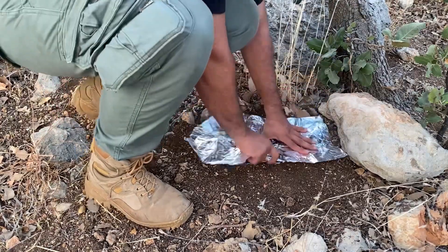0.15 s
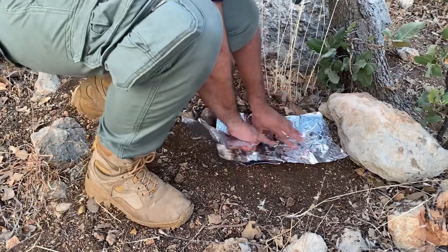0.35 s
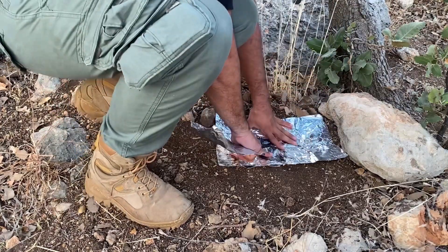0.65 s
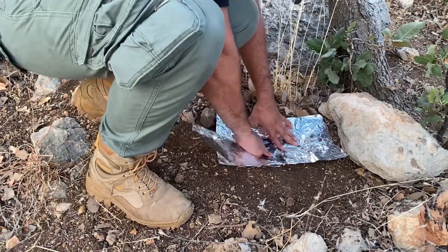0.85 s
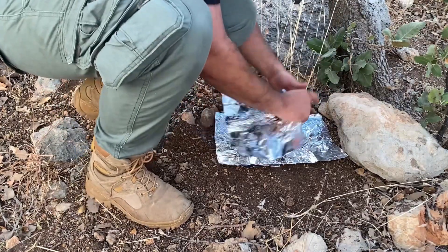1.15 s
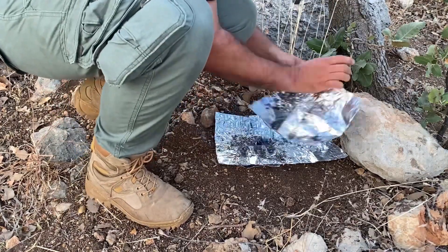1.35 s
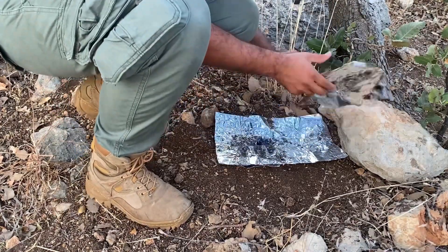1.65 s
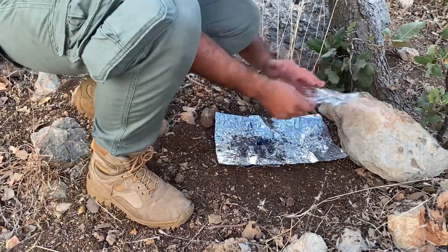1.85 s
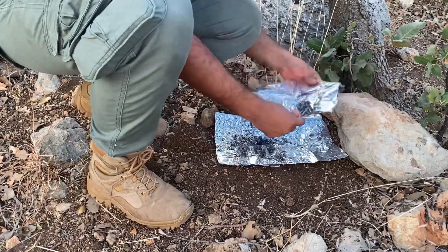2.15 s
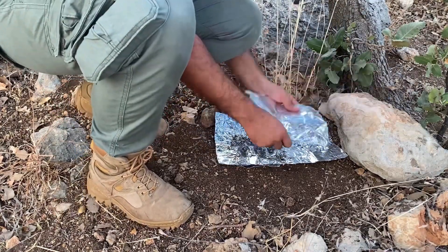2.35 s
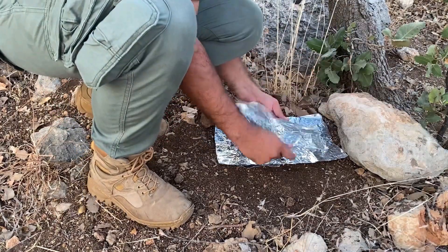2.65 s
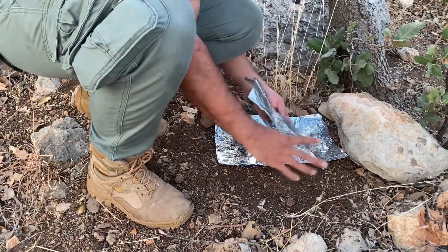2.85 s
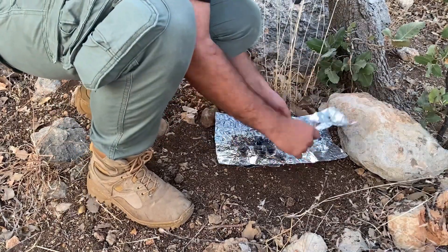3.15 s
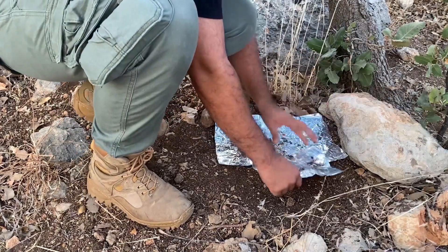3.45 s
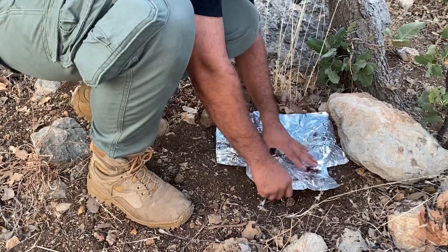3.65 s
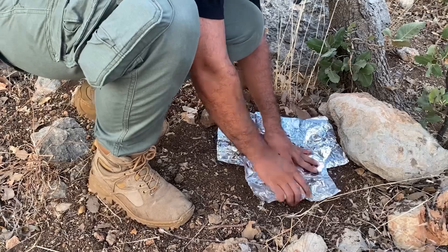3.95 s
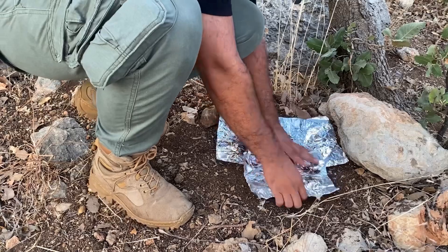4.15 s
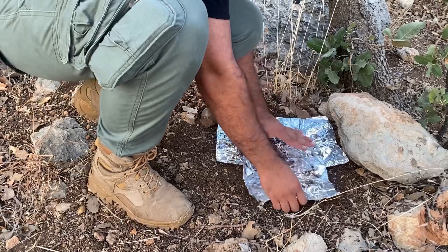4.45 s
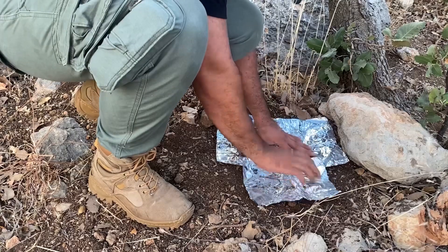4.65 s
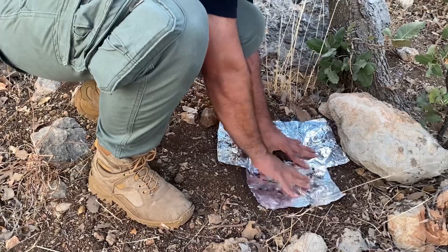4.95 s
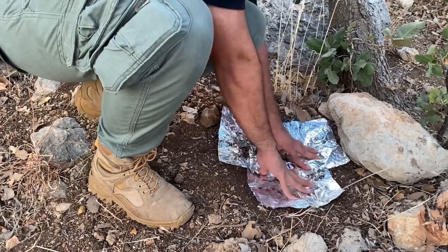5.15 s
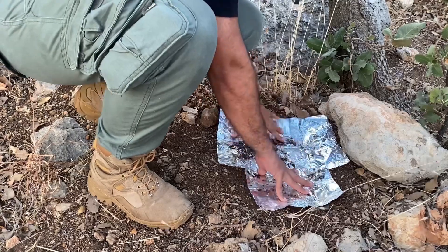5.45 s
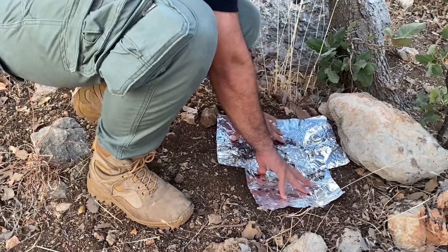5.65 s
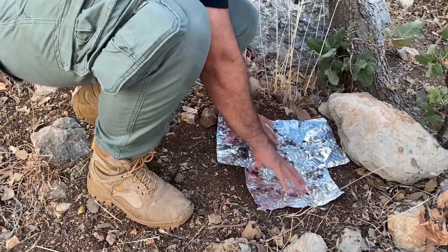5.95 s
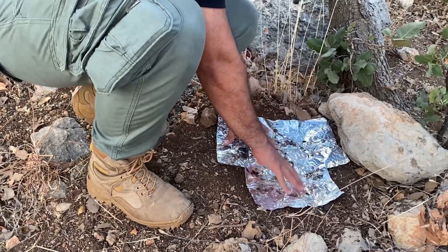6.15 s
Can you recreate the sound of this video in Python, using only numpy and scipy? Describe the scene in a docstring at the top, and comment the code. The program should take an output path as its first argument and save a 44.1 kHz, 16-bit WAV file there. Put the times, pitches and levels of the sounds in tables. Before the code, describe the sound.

Close outdoor stereo phone pickup of hands working a foil sheet on the ground. Bright, dry crinkling comes in quick strokes with sharp snaps, nearly stopping between early strokes. Fuller smoothing follows, with one tiny high squeak near 4.4 seconds. Wind rumble on the microphone is slight at first, then swells strongly from about 3.5 seconds and eases late. Air and far leaves are barely audible.

```python
"""Foil rustles and snaps close to a phone: hands unfold a sheet and smooth it over stony forest ground.
Rustle is shaped noise with tiny buckles and ringing facets; snaps are filtered bursts around a pitch.
A palm squeals once (three wavering harmonics) and patches of the sheet sing as short single modes.
A rising breeze buffets the microphone as lumpy low noise with separate eddy bursts.
Faint noise stands for far leaves and air."""
import sys
import numpy as np
from scipy import signal
from scipy.fft import rfft, irfft, next_fast_len
from scipy.io import wavfile
from scipy.ndimage import uniform_filter1d, map_coordinates

SR = 44100
rng = np.random.default_rng(int(sys.argv[2]) if len(sys.argv) > 2 else 0)


def invert_db(x):
    """Field ratio 10**(x/20) for x, a level in decibels (scalar or array-like)."""
    u = np.asarray(x, float) / 20
    return 10 ** u


def pcm_store(signal):
    """Save signal as 16-bit PCM."""
    levels = np.round(np.clip(np.atleast_2d(signal), -1, 1) * 32767)
    wavfile.write(sys.argv[1], SR, levels.astype(np.int16).T)


N = 277830

# sheet stirring in the hands between strokes: t/s, relative rustle level/dB, tilt/(dB per octave)
STIRRING = [(0, -44.5, -2), (.6, -74, 8), (.75, -54.5, -2.5), (1.2, -53.5, -1), (1.42, -66, -4.5),
            (1.7, -63, 1), (1.9, -58.5, -2.5), (2.1, -59.5, 3), (2.6, -59, -1.5), (2.82, -75, 2),
            (3.0, -66, 8), (3.16, -79, 3), (3.36, -78, 8), (3.42, -57, -11), (3.62, -55, -1),
            (4.15, -50, -3), (4.56, -58, -4.5), (5.1, -50, -3), (5.35, -58, -1), (5.8, -60.5, -1.5),
            (6.3, -65, -2.5)]
# hand strokes over the sheet: start/s, hold/s, relative rustle level/dB, tilt/(dB per octave)
HAND_STROKES = [(0, 0.02, -39.5, -1), (0.12, 0.017, -47.5, -1.2), (0.155, .11, -35.5, -0.7),
                (.39, 0.094, -41, -0.9), (0.557, 0.074, -41, -2), (0.673, 0.014, -54, 3.5),
                (1.256, 0.02, -42.5, -3), (1.317, 0.0059, -44, -0.5), (1.759, 0.0088, -53.5, -1.5),
                (1.853, 0.0094, -49.5, 2.2), (1.963, 0.049, -43, 0), (2.144, 0.0071, -47.5, -1.5),
                (2.261, 0.021, -51, 0), (2.314, 0.0099, -51.5, -4.5), (2.431, 0.097, -55.5, -1.7),
                (2.666, 0.058, -41.5, -2.5), (2.998, 0.0068, -43, 4), (3.054, 0.037, -48, 0),
                (3.387, 0.007, -47.5, 2), (3.477, .06, -45.5, -1), (3.697, .04, -43, -1),
                (3.812, 0.02, -43, -1.5), (4.093, 0.012, -35.5, 2.5), (4.208, 0.059, -43, 4),
                (4.409, 0.062, -33.5, 5.5), (4.673, 0.04, -49, 0), (4.915, 0.063, -46, -0.5),
                (5.02, 0.036, -42, -3), (5.126, 0.01, -50.5, 11), (5.185, 0.081, -55, 3.5),
                (5.477, 0.037, -40, -2.5), (5.722, 0.018, -60, -5), (5.8, 0.041, -57, 4.5)]
# snapping creases: t/s, relative level/dB, centre f/Hz, t60/s
CREASE_SNAPS = [(0.0304, -21.5, 10500, 0.02), (0.0375, -21.5, 1070, 0.019), (0.094, -30, 2730, 0.027),
                (0.1006, -28, 1330, 0.045), (0.1342, -57, 2600, 0.028), (0.3935, -46, 1340, 0.021),
                (0.408, -25.5, 3730, 0.041), (0.418, -28, 1480, 0.044), (0.4507, -24.5, 1120, 0.043),
                (0.4774, -25.5, 2320, 0.035), (0.492, -35, 5700, 0.035), (0.5497, -26.5, 1170, 0.027),
                (0.5596, -29, 1600, 0.063), (0.5831, -27, 1100, 0.022), (0.62, -28.5, 4370, 0.033),
                (0.632, -31.5, 2720, 0.029), (0.6582, -25, 7600, 0.048), (0.896, -39, 1410, 0.034),
                (0.9883, -30, 1300, 0.047), (1.2055, -40, 1270, 0.047), (1.2469, -34, 2360, 0.029),
                (1.2602, -27.5, 5200, 0.056), (1.3225, -33.5, 1690, 0.13), (1.7507, -35, 1850, 0.057),
                (1.8948, -37, 2360, 0.033), (1.909, -37, 1700, 0.037), (1.936, -23, 2880, 0.036),
                (1.942, -25, 3200, 0.11), (2.0053, -28, 2800, 0.026), (2.147, -39.5, 2710, 0.042),
                (2.2616, -24, 1060, 0.021), (2.2738, -21.5, 2040, 0.031), (2.316, -19.5, 2110, 0.025),
                (2.555, -38, 1100, 0.046), (2.8957, -47.5, 2540, 0.2), (2.9484, -40, 2780, 0.052),
                (3.003, -32, 2070, 0.06), (3.3808, -33, 2330, 0.077), (3.455, -36, 2960, 0.042),
                (3.8017, -21.5, 2130, 0.04), (3.8844, -34, 1980, 0.033), (3.9237, -32.5, 1490, 0.034),
                (3.9953, -36, 1820, 0.026), (4.0979, -26.5, 1260, 0.048), (4.2045, -35, 3560, 0.076),
                (4.6752, -35, 1160, 0.03), (4.711, -30.5, 1170, 0.03), (4.8816, -28, 1600, 0.031),
                (4.939, -33.5, 2830, 0.037), (4.9668, -37, 1130, 0.077), (5.0365, -22.5, 2300, 0.062),
                (5.0604, -28, 1600, 0.03), (5.0918, -25, 4450, 0.023), (5.1279, -15, 2450, 0.016),
                (5.163, -30, 2170, 0.027), (5.1892, -32, 1510, 0.024), (5.2215, -34.5, 1220, 0.047),
                (5.268, -31, 2060, 0.03), (5.427, -27, 2710, 0.027), (5.4806, -29.5, 1760, 0.089),
                (5.7126, -36.5, 1170, 0.043), (5.7996, -46.5, 3080, 0.089)]
# palm sticking and slipping fast: t/s, pitch f/Hz, level/dB, 2nd harmonic level/dB, 3rd harmonic level/dB
PALM_SQUEAL = [(4.369, 4230, -44, -49, -75), (4.38, 4190, -36.5, -37, -60), (4.402, 4220, -26, -29, -66),
               (4.413, 4100, -37, -38, -66), (4.425, 4100, -33, -37, -65), (4.438, 4040, -34, -42, -64)]
# patches that sing for a moment: start/s, length/s, f/Hz, relative level/dB
SINGING_PATCHES = [(.13, .077, 2540, -48), (1.753, .037, 3500, -56), (1.991, .04, 2800, -48),
                   (1.995, .018, 4800, -50), (2.72, .11, 845, -59), (3.0, .017, 1000, -47.5),
                   (3.002, .11, 2030, -57), (3.005, .095, 1280, -59.5), (4.096, .022, 1220, -43),
                   (4.39, .03, 10100, -33), (4.398, .04, 10750, -37), (4.402, .017, 9400, -33),
                   (4.42, .04, 6840, -29), (4.436, .032, 3200, -38), (4.438, .025, 11000, -34),
                   (4.44, .03, 4640, -37), (4.442, .045, 7700, -35), (4.445, .018, 12270, -38),
                   (4.46, .045, 2360, -38.5), (4.465, .04, 1880, -45), (5.709, .03, 2440, -55),
                   (5.712, .025, 1220, -49)]
# foil spectrum: f/Hz, relative density/dB
FOIL_SPECTRUM = [(150, -69), (400, -8), (900, -8), (2500, -6), (5000, -10), (7500, -8), (9000, -7),
                 (12000, -14.5), (13000, -18.5), (14500, -15.5), (16000, -26)]
# breeze between gusts: t/s, relative buffet level/dB, relative brightness of the upper part/dB
BREEZE = [(0, -52, -8), (.4, -63, 3.5), (.8, -55.5, -12.5), (1.05, -59.5, -6), (1.5, -67.5, -1),
          (1.85, -67, -1), (2.1, -51.5, -21), (2.45, -45.5, -23), (2.7, -52, -26), (2.95, -58, -4.5),
          (3.25, -62, -8.5), (3.35, -47, -23), (3.95, -43.5, -8.5), (4.5, -42.5, -6), (5.3, -38, -12),
          (6.0, -43, -15.5), (6.3, -48, -21)]
# gusts: start/s, hold/s, relative buffet level/dB, relative brightness/dB
WIND_GUSTS = [(0.13, .02, -43.5, -29), (0.207, 0.047, -54, 9), (0.433, 0.046, -55, -6),
              (0.819, 0.04, -51.5, -2.5), (0.894, 0.037, -40.5, -40), (1.292, 0.11, -57, -5),
              (1.92, 0.098, -52, 3), (2.434, 0.074, -43.5, -16), (2.517, 0.068, -41, -6.5),
              (2.61, 0.053, -45, -12), (2.818, 0.055, -48, -33), (3.352, 0.17, -40, -24.5),
              (3.573, 0.012, -35, -31), (3.71, 0.021, -33.5, -24), (3.78, 0.11, -35, -7.5),
              (4.074, .08, -29.5, -5), (4.206, 0.068, -27.5, -6.5), (4.357, 0.027, -25.5, -15.5),
              (4.414, 0.048, -26, -0.5), (4.503, 0.041, -30, -2), (4.599, 0.072, -29.5, -3),
              (4.698, 0.058, -31.5, 2), (4.795, 0.041, -30, -7.5), (4.863, 0.026, -33, 3.5),
              (4.925, 0.055, -31, -2.5), (5.088, 0.069, -32, 0.5), (5.197, 0.045, -28.5, 3.5),
              (5.272, 0.04, -36.5, 4.5), (5.377, 0.023, -31, -8.5), (5.433, 0.059, -31.5, -1.5),
              (5.598, 0.047, -35, -3.5), (5.82, 0.067, -38.5, 2), (5.923, 0.023, -38.5, -7),
              (6.035, 0.012, -40.5, 10.5), (6.2, 0.1, -41.5, -17)]
# single eddies bursting on the port: t/s, relative level/dB, starting f/Hz
EDDY_PUFFS = [(3.807, -21.5, 317), (3.849, -27, 250), (4.062, -20.5, 257), (4.117, -25, 337),
              (4.412, -21.5, 390), (4.434, -19, 252), (4.455, -27, 355), (4.501, -24, 352),
              (4.546, -22, 382), (4.578, -28.5, 320), (4.617, -24.5, 450), (4.643, -27.5, 370),
              (4.693, -26, 538), (4.715, -23, 355), (4.809, -26, 250), (5.07, -27, 250), (5.119, -21, 250),
              (5.198, -24, 252), (5.224, -19, 268), (5.44, -21.5, 377), (5.595, -33.5, 260)]
# buffet spectrum: f/Hz, relative density/dB
BUFFET_SPECTRUM = [(15, -74), (28, -12), (40, -7.5), (62, 4), (85, 1), (130, -2.5), (250, -8.5),
                   (450, -17.5), (700, -30), (1000, -47.5), (1500, -70.5)]
# reach of brightness into the buffet: f/Hz, share/1
BRIGHTNESS_REACH = [(120, 0), (350, 0.7), (700, 1.3)]
# forest spectrum: f/Hz, relative density/dB
FOREST_SPECTRUM = [(20, 2.5), (60, 19.5), (200, -22.5), (600, -0.5), (2000, -13), (6000, -14.5),
                   (12000, -16.5), (16000, -39)]
# ports, airborne sound: f/Hz, left lead/rad
PORT_LEAD = [(0, 0), (1800, 0), (3300, .6), (5400, .2), (6000, -.8), (7000, -.3), (8300, -3.1),
             (10400, -6.1), (11600, -6.5), (12700, -9.4), (14400, -9.45), (15200, -12.6), (16600, -12.6)]
# ports, airborne sound: f/Hz, left-right likeness/1
PORT_LIKENESS = [(100, .87), (700, .72), (1600, .84), (4000, .83), (6500, .6), (8500, .93), (11000, .97),
                 (12700, .995)]
# ports, airborne sound: f/Hz, left minus right/dB
PORT_LEAN = [(200, -.8), (700, -3), (1100, 0), (4000, -.6), (12000, -.2)]
# ports, wind: f/Hz, left lead/rad
WIND_PORT_LEAD = [(40, .2), (250, .35), (800, 1.05)]
# ports, wind: f/Hz, left minus right/dB
WIND_PORT_LEAN = [(250, 0), (450, 2), (800, 10.5)]

STROKE_BASE_RISE_DB_PER_S, STROKE_FALL_DB_PER_S = 330, 404
FLICK_S = 0.023  # a shorter stroke rises at more than twice the base rate
GUST_RISE_DB_PER_S, GUST_FALL_DB_PER_S = 502, 350
# chance pops of small creases: level over the stirring, scatter per e-fold, pitch range, decay
POP_OVER_DB, POP_SCATTER_DB, POP_LOW_HZ, POP_HIGH_HZ, POP_T60_S = 9.5, 1.5, 1100, 4000, 0.039
TOP_HZ = 15900
TIMES_S = np.arange(0, N / SR + .01, .002)


def rustle():
    """Dense tiny buckles and ringing facets over sliding noise, clumped in time and patchy in pitch."""
    hands = rubbing()
    level_db, _ = curves(hands, np.arange(N) / SR)
    chance, size = rng.random((2, N))
    buckles = (chance < 500 / SR) * invert_db(-4.5 * np.log(size + .02))  # about 500 a second
    t = np.arange(SR // 100) / SR
    ring = invert_db(-60 * t / .006) * rng.standard_normal(len(t))  # t60 6 ms
    crackle = unit(signal.fftconvolve(buckles, ring)[:N])
    sliding = rng.standard_normal(N)
    raw = 1.1 * crackle + .4 * facets(count=3500) + sliding
    raw = raw * invert_db(1.5 * wobble(40) + 1.5 * wobble(120))

    def colour_db(hz, t):
        octaves = np.log2((np.minimum(hz, 7000) + 200) / 3000)
        tilt_db = curves(hands, t)[1] * octaves
        patches = field((len(hz), len(t)), 2, 5)
        return along(FOIL_SPECTRUM, hz) + tilt_db + 2.67 * patches

    return invert_db(level_db - 4.0) * unit(painted(raw, colour_db, size=512))


def rubbing():
    """Rows (t/s, relative rustle level/dB, tilt/(dB per octave)): stirring plus strokes, flicks more abrupt."""
    hold_s = np.maximum(np.transpose(HAND_STROKES)[1, :, None], .005)
    rise_db_per_s = STROKE_BASE_RISE_DB_PER_S * (1 + FLICK_S / hold_s)
    return swells(STIRRING, HAND_STROKES, rise_db_per_s, STROKE_FALL_DB_PER_S)


def facets(count):
    """Small flat facets between creases, each ringing at its own pitch for a few dozen cycles."""
    start, pitch, life, size = rng.random((count, 4)).T[..., None]
    hz = 800 * 14 ** pitch
    t = np.arange(1200) / SR
    t60_s = np.minimum((25 + 60 * life) / hz, .035)
    decay = invert_db(-5 * np.log(size + 0.11) - 60 * t / t60_s)
    onset = 1 - np.exp(-t / 0.000068)
    rings = decay * onset * np.sin(2 * np.pi * hz * t)
    at = (start * N).astype(int) + np.arange(len(t))
    return unit(np.bincount(at.ravel(), rings.ravel())[:N])


def snaps():
    """Creases crack around a pitch and ring a few facets; slow folds crack less and shiver longer."""
    out, t = np.zeros(N + 4096), np.arange(4096) / SR
    hz = np.fft.rfftfreq(len(t), 1 / SR)

    def band(centre_hz, width_hz):
        damping = 1j * hz * width_hz
        return damping / (centre_hz ** 2 - hz ** 2 + damping)

    edge = invert_db(-7.0) * (1j * hz / (8000 + 1j * hz)) ** 2  # high-passed share of the burst
    foil = invert_db(.5 * along(FOIL_SPECTRUM, hz))
    for s, db, centre_hz, t60_s in CREASE_SNAPS + pops(count=130):
        noise = rng.standard_normal((2, len(t)))
        modes = np.append(0, rng.normal(0.32, 0.527, 4))  # log pitch ratios
        t60_s = max(t60_s, .005)
        sharp = np.clip(.03 / t60_s, 0, 1) ** 1.5
        shiver = (1 - np.exp(-t / 0.00096)) * invert_db(-60 * t / t60_s)
        burst = sharp * invert_db(-60 * t / .0045) * noise[0] + .3 * shiver * noise[1]
        rings = sum(band(centre_hz * np.exp(m), 230) for m in modes)
        response = band(centre_hz, 2.47 * centre_hz) + 2.75 * rings + edge
        crack = irfft(rfft(burst) * response * foil, len(t))
        out[round(s * SR):][:len(t)] += invert_db(db - 3.0) * crack / np.abs(crack).max()
    return out[:N]


def pops(count):
    """Rows like the crease snaps, at random moments, their level following the stirring."""
    when, size, pitch = rng.random((count, 3)).T
    s = when * N / SR
    db = curves(STIRRING, s)[0] + POP_OVER_DB - POP_SCATTER_DB * np.log(size + 0.028)
    centre_hz = POP_LOW_HZ * (POP_HIGH_HZ / POP_LOW_HZ) ** pitch
    return [(*row, POP_T60_S) for row in zip(s, db, centre_hz)]


def squeal():
    """Stick-slip gives a wavering pitch with two overtones."""
    t = np.arange(N) / SR
    hz, *levels_db = curves(PALM_SQUEAL, t)
    start_s, end_s = PALM_SQUEAL[0][0], PALM_SQUEAL[-1][0]
    on = np.clip(np.minimum(t - start_s, end_s - t) / 0.0025, 0, 1)
    phase = 2 * np.pi * np.cumsum(hz + 25 * wobble(220)) / SR
    harmonics = sum(invert_db(db) * np.sin(k * phase) for k, db in enumerate(levels_db, 1))
    return np.sqrt(2) * on * invert_db(2.4 * wobble(150)) * harmonics


def singing():
    """A rubbed patch holds one mode, swelling fast and fading, rough in level and phase."""
    out = np.zeros(N)
    for s, length_s, hz, db in SINGING_PATCHES:
        i = round(s * SR) + np.arange(round(length_s * SR))
        u = np.linspace(0, 1, len(i))
        knots = rng.standard_normal((2, 64))
        rough = [np.interp(u * length_s * 250, np.arange(64), r) for r in knots]  # 250 knots/s
        phase = 2 * np.pi * hz * u * length_s + hz / 4000 * rough[0]
        level = invert_db(db + np.sqrt(hz / 400) * rough[1])
        out[i] += level * np.sin(np.pi * u ** .5) * np.sin(phase)
    return out


def ground(x):
    """Stones, legs and the moving hands scatter the sound with phases that keep drifting."""
    z = signal.stft(x, nperseg=256)[2]
    drift_rad = 2.2 * field(z.shape, 4, 24)
    return signal.istft(z * np.exp(1j * drift_rad), nperseg=256)[1][:N]


def wind():
    """Eddies hit the ports in lumps; the brightness curve and a quick flutter move their upper part."""
    air, t_s = blowing(), np.arange(N) / SR
    level_db, _ = curves(air, t_s)
    lumps = invert_db(.8 * wobble(25) + 3.5 * np.tanh(wobble(70)))
    flutter_db = 5.1 * np.tanh(wobble(50)) + 5.9 * np.tanh(wobble(100))

    def bright_db(hz, t):
        return along(BRIGHTNESS_REACH, hz) * (curves(air, t)[1] + 8 + np.interp(t, t_s, flutter_db))

    eddies = filtered(lumps * rng.standard_normal((2, N)), lambda hz: invert_db(along(BUFFET_SPECTRUM, hz)))
    body_rms = filtered(eddies, lambda hz: hz < 200).std()
    eddies = painted(eddies, bright_db, size=256) / body_rms
    common, unrelated = invert_db(level_db - 2.5) * eddies
    likeness = [(40, 0.88), (300, 0.92)]  # f/Hz, likeness/1
    return ports(common + puffs(), unrelated, likeness, WIND_PORT_LEAD, WIND_PORT_LEAN)


def blowing():
    """Rows (t/s, relative buffet level/dB, relative brightness/dB) of breeze and gusts together."""
    return swells(BREEZE, WIND_GUSTS, GUST_RISE_DB_PER_S, GUST_FALL_DB_PER_S)


def puffs():
    """A single strong eddy bursts on the port: a few quick low cycles that sink in pitch."""
    out, t = np.zeros(N + SR), np.arange(SR // 20) / SR
    envelope = np.exp(1) * t / 0.0049 * np.exp(-t / 0.003)
    for s, db, hz in EDDY_PUFFS:
        swing = np.sin(2 * np.pi * hz * t * (1 - 6 * t) + rng.uniform(0, np.pi))
        out[round(s * SR):][:len(t)] += invert_db(db - 1.0) * envelope * swing
    return out[:N]


def forest():
    """Far leaves and air: smooth, faint shaped noise."""
    air = filtered(rng.standard_normal((2, N)), lambda hz: invert_db(along(FOREST_SPECTRUM, hz)))
    return invert_db(-65.5 + 0.19 * wobble(2.8)) * unit(air)


def ports(x, other, alike, lead, lean):
    """Two ports hear x, each plus or minus a share of an unrelated sound, with their own lag and level."""
    side = np.array([[1], [-1]])  # left, right

    def turn(hz):
        return np.arccos(np.clip(along(alike, hz), 0, 1)) / 2

    def offset(hz):
        return invert_db(side * along(lean, hz) / 2) * np.exp(.5j * side * along(lead, hz))

    shared = filtered(x, lambda hz: np.cos(turn(hz)))
    apart = filtered(other, lambda hz: np.sin(turn(hz)))
    return filtered(shared + side * apart, offset)


def swells(steady, events, rise_db_per_s, fall_db_per_s):
    """Events rise, hold and fall over a steady level; powers add and weight the colour."""
    start, hold, db, colour = np.transpose(events)[..., None]
    steady_db, steady_colour = curves(steady, TIMES_S)
    before_s = np.maximum(start - TIMES_S, 0)
    after_s = np.maximum(TIMES_S - start - hold, 0)
    each_db = db - rise_db_per_s * before_s - fall_db_per_s * after_s
    power, steady_power = invert_db(2 * each_db), invert_db(2 * steady_db)
    total = power.sum(0) + steady_power
    mean_colour = ((power * colour).sum(0) + steady_power * steady_colour) / total
    return np.transpose([TIMES_S, 10 * np.log10(total), mean_colour])


def field(shape, across, lasting):
    """A random map over frequency and time, smooth over so many bins and frames."""
    over_bins = uniform_filter1d(rng.standard_normal(shape), across, 0)
    return unit(uniform_filter1d(over_bins, lasting, 1))


def painted(x, gain_db, size):
    """x with a gain that depends on frequency and time."""
    hz, t, z = signal.stft(x, SR, nperseg=size)
    return signal.istft(z * invert_db(gain_db(hz[:, None], t)), SR, nperseg=size)[1][..., :N]


def filtered(x, response):
    """x through a complex response of frequency."""
    m = next_fast_len(N + 8192)
    return irfft(rfft(x, m) * response(np.fft.rfftfreq(m, 1 / SR)), m)[..., :N]


def wobble(rate):
    """A smooth random curve, rate knots a second."""
    knots = rng.standard_normal(int(N * rate / SR) + 4)
    return map_coordinates(knots, [np.arange(N) * rate / SR])


def curves(rows, t):
    """Each column after the time, read at times t."""
    s, *cols = np.transpose(rows)
    return [np.interp(t, s, c) for c in cols]


def along(points, hz):
    """(f/Hz, value) points read on a log axis."""
    f, v = np.transpose(points)
    return np.interp(np.log(hz + 1), np.log(f + 1), v)


def unit(x):
    """Scaled to rms 1."""
    return x / np.sqrt(np.mean(x ** 2) + 1e-20)


def scene():
    """Foil and forest reach both ports through the air; the wind acts on them directly."""
    foil = rustle() + snaps() + squeal() + singing()
    air = forest()
    airborne = ports(foil + air[0], ground(foil) + air[1], PORT_LIKENESS, PORT_LEAD, PORT_LEAN)
    return airborne + wind()


def roll_off(x):
    """The treble ends steeply here."""
    return signal.sosfilt(signal.butter(12, 17010, fs=SR, output="sos"), x)


def record(dry):
    """The phone keeps nothing above its band limit."""
    mix = filtered(dry, lambda hz: hz < TOP_HZ)
    return roll_off(mix)


dry = scene()
out = record(dry)
pcm_store(out)
```